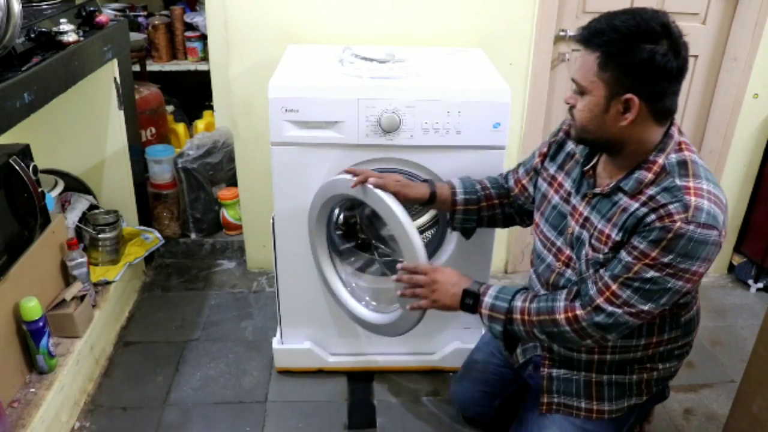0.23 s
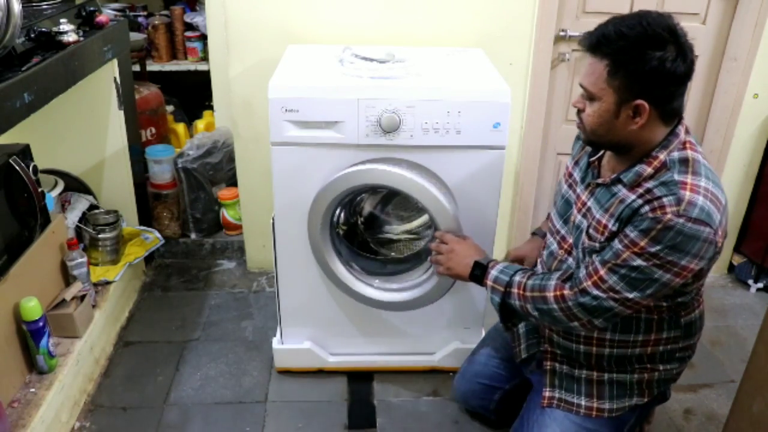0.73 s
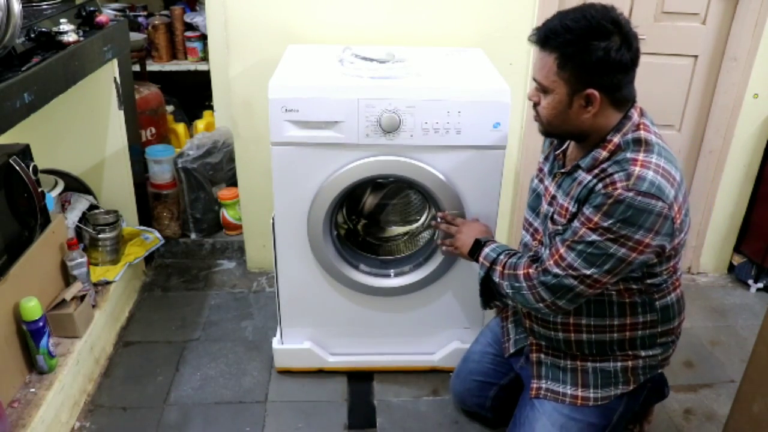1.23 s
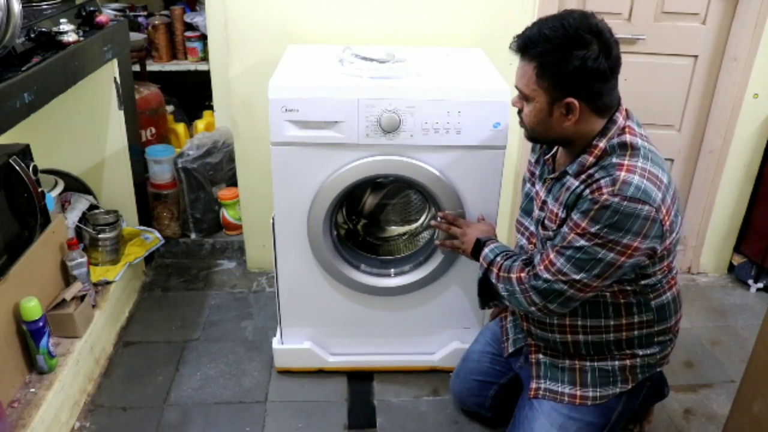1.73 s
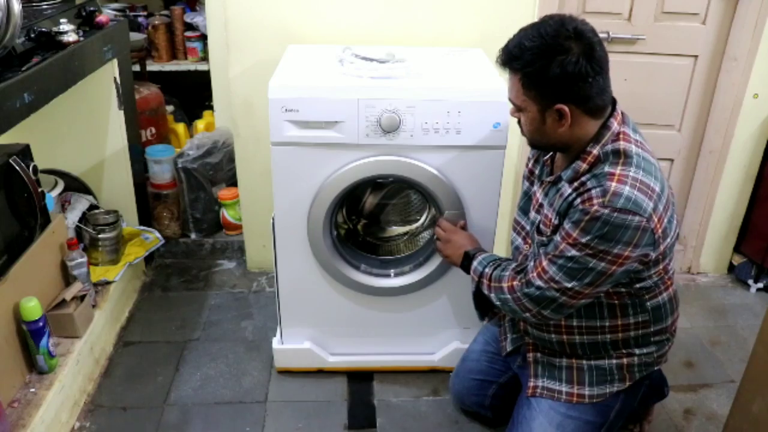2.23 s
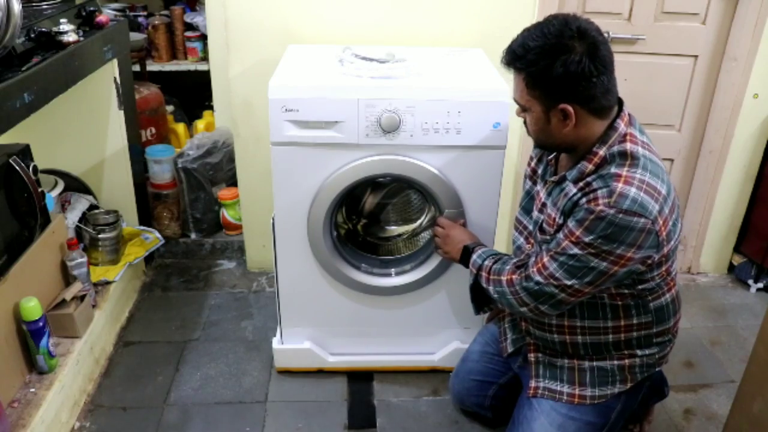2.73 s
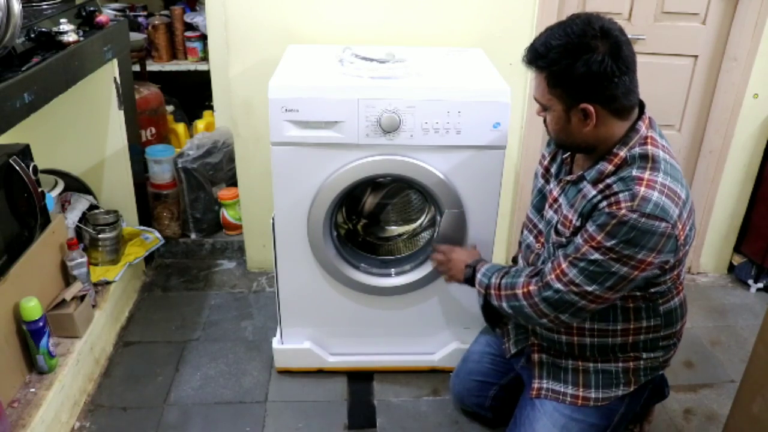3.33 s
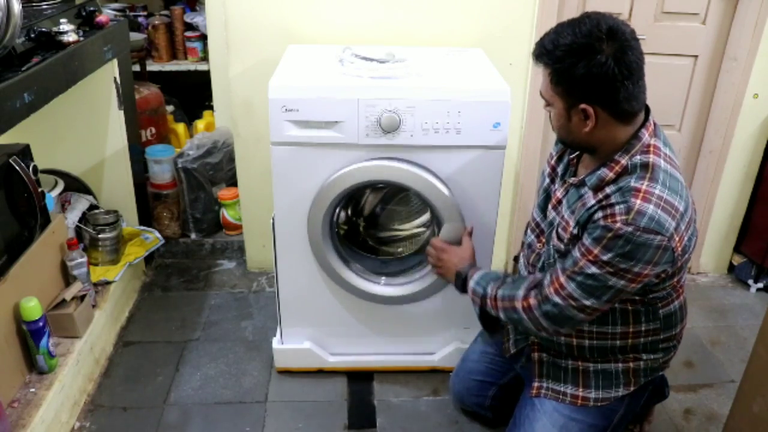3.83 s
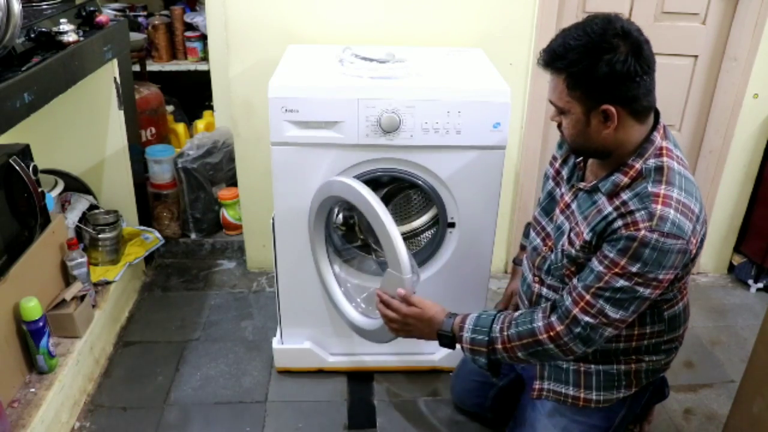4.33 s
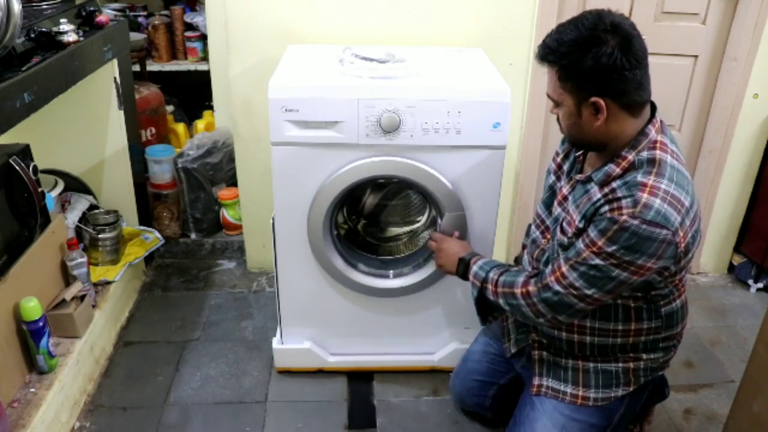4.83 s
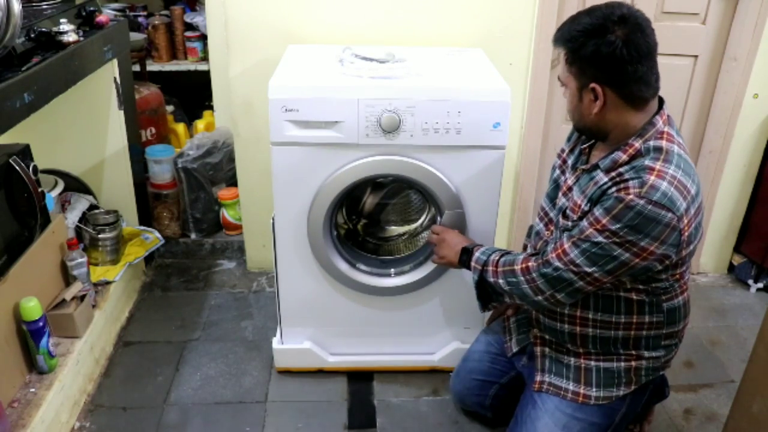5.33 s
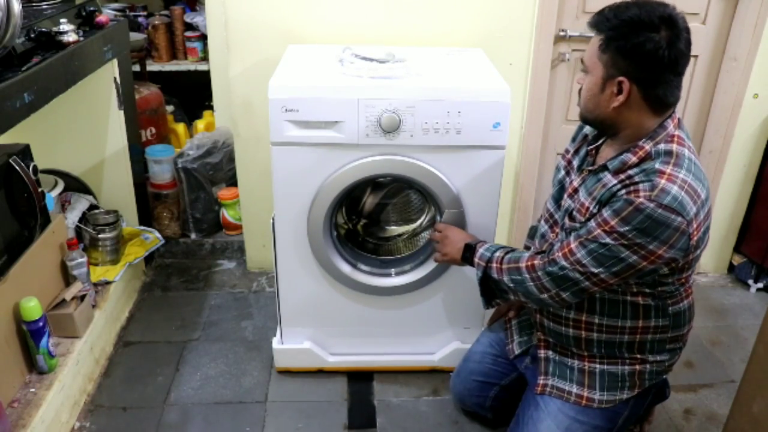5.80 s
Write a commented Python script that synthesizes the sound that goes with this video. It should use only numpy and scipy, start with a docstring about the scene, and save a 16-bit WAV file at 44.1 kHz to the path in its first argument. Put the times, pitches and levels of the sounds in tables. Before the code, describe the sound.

A quiet small tiled room with still air, low rumble and thin hiss. Sleeves swish softly at 0 and 0.4 seconds, and a hand brushes the door at 0.9. At 1.15 the hook knocks the catch with a quick bounce and a low cabinet boom. Light rubbing follows, with a plastic handle click at 2.1. Around 2.5 the seal groans and squeezes, then the latch snaps in a rapid cluster and the rim lands loudly, ringing briefly. Faint click at 2.9, cloth at 3.1, handle click at 3.7. At 3.85 the door jerks free in a dull, rubbery triple pop. From 4.05 to 4.9 five soft tub knocks grow duller and fade amid rubbing. The hook knocks again at 4.99, the seal squeaks at 5.2, and the second hard snap and slam comes at 5.53, with short echoes. The rumble swells slightly; a tiny click at 5.9.

```python
"""In a small tiled room the porthole door of a front-load washing machine is handled.
Twice its hook knocks against the catch and the door is then pushed home with a snap; in between it pops off
its seal and the tub rocks on its springs. Each blow is shaped noise with echoes and decaying modes.
Sleeves, hand and seal rub as swelling noise over still air, a low rumble and a thin hiss."""
import sys
import numpy as np
from scipy import signal
from scipy.fft import rfft, irfft
from scipy.io import wavfile
from scipy.ndimage import uniform_filter1d

SR = 44100
rng = np.random.default_rng(int(sys.argv[2]) if len(sys.argv) > 2 else 0)


def persist_wave(psi):
    """Save psi, clipped to +-1, as 16-bit WAV."""
    counts = np.round(np.clip(psi, -1, 1) * 32767).astype(np.int16)
    wavfile.write(sys.argv[1], SR, np.atleast_2d(counts).T)


N = 267334
TIME = np.arange(N) / SR  # s
RING_TIME = TIME[:32768]  # s, the span of one blow with its echoes
RING_HZ = np.arange(len(RING_TIME) // 2 + 1) * SR / len(RING_TIME)

# A blow is (start in s, energy of its crack in dB, tilt in dB per octave: its brightness).
# The door is pushed home. Each row: landing of the rim in seconds, then latch, rim and seal levels in dB.
CLOSINGS = [(2.5325, 2.5, 4.5, -12.5), (5.529, 3, 6, -18.5)]
# The hook meets the catch without locking. Each row: start in seconds, hook level in dB,
# hook tilt in dB per octave, cabinet level in dB.
KNOCKS = [(1.1485, -8.5, -0.1, -14.5), (4.9888, -8.5, 0.25, -28)]
# The door is pulled off its seal in jerks. Each row: start in seconds, lever level in dB, seal level in dB.
JERKS = [(3.837, -10, -5.5), (3.8544, -12, -1), (3.877, -15.5, -3.5)]
# Long rings of the door. Each row: frequency in Hz, relative level in dB, T60 in seconds.
DOOR_MODES = [(71, -6, 0.38), (109.7, -23, 0.69), (148, -15.5, 0.94), (200.4, -9.5, 0.56), (396, 1, 0.17),
              (441, 2, 0.26), (665, -6.5, 0.27), (845.4, 8.5, 0.16), (941, 2, 0.24), (1122, -2, 0.16),
              (1190, 0, 0.27), (1273, 2.5, 0.17), (1700, 1, 0.19), (1967, -0.5, 0.22), (2130, 0, 0.2),
              (2320, -11, 0.32), (3390, -8, 0.22), (3570, -2.5, .22)]
# Spectrum of the rubber seal. Each row: frequency in Hz, relative level in dB.
SEAL_COLOUR = [(25, -16), (70, -1), (150, 0), (290, 2), (420, -9.5), (1000, -12.5), (2000, -32),
               (10000, -61)]


def undb(db):
    """Amplitude gain is ten to the power of the level over 20 dB."""
    return 10 ** (np.asarray(db) / 20)


def at(points, hz):
    """Interpolate (Hz, value) points linearly on a log-frequency axis."""
    f, value = np.transpose(points)
    return np.interp(np.log(hz + 1), np.log(f), value)


def unit(x):
    """Normalise by the root of the energy, the sum of squares, to an energy of one."""
    return x / np.sqrt(np.sum(x ** 2))


def fade(t60):
    """Exponential damping: the amplitude falls by 60 dB in t60 seconds."""
    return np.exp(-np.log(1000) * RING_TIME / t60)


def add(track, s, sound):
    """Superposition: mix a sound into a track from time s in seconds."""
    start = int(s * SR)
    track[start:start + len(sound)] += sound[:N - start]


def noise(colour):
    """Filtered white noise: shape its spectrum by a (Hz, dB) curve and scale to a deviation of one."""
    spectrum = rfft(rng.standard_normal(N))
    gain = undb(at(colour, np.arange(N // 2 + 1) * SR / N))
    x = irfft(spectrum * gain, N)
    return x / x.std()


def causal(db):
    """Minimum phase by folding the cepstrum: nothing sounds before the blow."""
    cepstrum = irfft(np.log(undb(db)))
    cepstrum[1:] *= 2
    cepstrum[len(cepstrum) // 2:] = 0
    return np.exp(rfft(cepstrum))


def even(x, size):
    """Spectral whitening: level the broad humps over size bins and leave the fine structure."""
    spectrum = rfft(x)
    power = uniform_filter1d(np.abs(spectrum) ** 2, size)
    return spectrum * causal(-10 * np.log10(power + 1e-12))


def echoes(count, build_s):
    """Reverberation as noise bands decaying exponentially, with one independent tail per blow."""
    # Each row: band centre in Hz, T60 in seconds; the treble mostly dies first.
    room_t60 = [(60, 0.78), (200, 0.59), (500, 0.46), (1200, 0.4), (3500, 0.42), (6000, 0.38), (9000, 0.3),
                (15000, 0.2)]
    scatter = rfft(rng.standard_normal((count, len(RING_TIME))))
    centres = np.transpose(room_t60)[0]
    tails = np.zeros((count, len(RING_TIME)))
    for share, (hz, t60) in zip(np.eye(len(centres)), room_t60):
        band_gain = at(np.transpose([centres, share]), RING_HZ)  # overlapping bands that sum to one
        tails += irfft(scatter * band_gain) * fade(t60)
    # echoes off tiles and walls thicken after a short gap
    return tails * np.clip(RING_TIME / build_s - 0.3, 0, 1)


def strike(blows, colour, modes, chatter_s, chatter_db, room_db, modes_db, low_hz):
    """Impact excitation: a crack with chatter and echoes, plus a sum of damped modes."""
    track = np.zeros(N)
    # a part radiates little at wavelengths larger than itself
    low_loss_db = 10 * np.log10(1 + (low_hz / np.maximum(RING_HZ, 10)) ** 4)
    body_db = at(colour, RING_HZ) - low_loss_db
    octaves = np.log2(np.maximum(RING_HZ, 200) / 1000)  # the tilt pivots at 1 kHz
    # loose parts buzz against each other until they seat
    seating = np.exp(-(RING_TIME / chatter_s) ** 2)
    rings = np.array([undb(db) * fade(t60) * np.exp(2j * np.pi * hz * RING_TIME) for hz, db, t60 in modes])
    rings *= 1 - fade(0.0077)  # the rings build up gradually
    for (s, db, tilt), tail in zip(blows, echoes(count=len(blows), build_s=0.0083)):
        contact = undb(chatter_db) * unit(rng.standard_normal(len(RING_TIME)) * seating)
        contact[0] += 1  # the first impulse
        contact = unit(contact) + undb(room_db) * unit(tail)
        crack = irfft(even(contact, size=180) * causal(body_db + tilt * octaves))
        # the point of contact changes, so each blow catches the modes at another phase
        phases = np.exp(2j * np.pi * rng.random(len(modes)))
        tones = (phases @ rings).imag
        add(track, s, undb(db) * (unit(crack) + undb(modes_db) * unit(tones)))
    return track


def latch():
    """Snap action: the hook rides up the sprung catch, slips over it and snaps in, three impacts per closing."""
    # Each row: lead before the rim lands in seconds, level added in dB, tilt in dB per octave.
    latch_action = [(0.0143, -7.5, -4.5), (0.0068, -1.5, 0.83), (0.0038, 1, 0.5)]
    # Each row: frequency in Hz, relative level in dB.
    latch_colour = [(60, 4), (280, -12.5), (450, 4), (900, 2), (1500, -1), (2700, -0.5), (4000, -5),
                    (5200, -12), (7500, -15.5), (8700, -7), (9600, -22.5), (15000, -27.5)]
    blows = [(s - lead, latch_db + db, tilt)
             for s, latch_db, _, _ in CLOSINGS for lead, db, tilt in latch_action]
    return strike(blows, latch_colour, DOOR_MODES,
                  chatter_s=0.0088, chatter_db=22, room_db=-2, modes_db=-9.5, low_hz=67)


def rim():
    """Impact of the door: its rim lands at each closing and excites the door modes."""
    # Each row: frequency in Hz, relative level in dB.
    door_colour = [(70, -17.5), (200, -1), (290, -15.5), (420, -2), (620, -11), (850, 5.5), (1080, -6),
                   (1900, -2), (3300, -14), (6000, -24), (15000, -38)]
    blows = [(s, rim_db, -0.34) for s, _, rim_db, _ in CLOSINGS]
    return strike(blows, door_colour, DOOR_MODES,
                  chatter_s=0.0051, chatter_db=1, room_db=-5.5, modes_db=-1, low_hz=64.5)


def hook():
    """Rebound: the hook hits the catch and bounces once, as a second, weaker impact."""
    bounce_s, bounce_db = 0.0066, -2.2  # delay, level change
    # Each row: frequency in Hz, relative level in dB.
    hook_colour = [(60, -13.5), (300, -13), (480, -1), (700, -10.5), (920, -1), (1280, 1.5), (1900, -2.5),
                   (2600, -13.5), (3400, -20.5), (4200, -22), (7000, -35.5), (15000, -47)]
    # Each row: frequency in Hz, relative level in dB, T60 in seconds.
    hook_modes = [(146, -7, 0.5), (320, -11.5, 1), (421, -10, 0.21), (880, 1, 0.39), (1147, 5.5, 0.24),
                  (1275, 6, 0.16), (1540, 2, 0.16), (1640, -29, 0.2), (1976, 8, 0.11), (1880, -20, 0.16)]
    blows = []
    for s, db, tilt, _ in KNOCKS:
        blows += [(s, db, tilt), (s + bounce_s, db + bounce_db, tilt)]
    return strike(blows, hook_colour, hook_modes,
                  chatter_s=0.0054, chatter_db=12.5, room_db=-6.5, modes_db=-6.5, low_hz=90)


def seal():
    """Soft impacts drive cabinet modes: the seal is squeezed, the cabinet booms, the seal pops free."""
    squeeze_lead_s, cabinet_lag_s = 0.0265, 0.016  # before the rim lands, after the hook knocks
    # Each row: frequency in Hz, relative level in dB, T60 in seconds.
    cabinet_modes = [(71, -19, 0.59), (102, -4, 0.22), (152.2, 11, 0.44), (204, 8, .26), (289, -3.5, 0.27),
                     (499, 0.5, 0.24)]
    squeezes = [(s - squeeze_lead_s, db, -0.3) for s, _, _, db in CLOSINGS]
    booms = [(s + cabinet_lag_s, db, -0.29) for s, _, _, db in KNOCKS]
    pops = [(s, db, 0.092) for s, _, db in JERKS]
    return strike(squeezes + booms + pops, SEAL_COLOUR, cabinet_modes,
                  chatter_s=0.025, chatter_db=3.5, room_db=-3.5, modes_db=-3.0, low_hz=32)


def handle():
    """Light impacts on plastic: the handle clicks under the fingers and its lever at each jerk of the pull."""
    # Each row: start in seconds, level in dB, tilt in dB per octave.
    clicks = [(1.881, -30.5, -4), (2.0945, -15, -0.4), (2.922, -29, -5.5), (3.7065, -17, -1),
              (5.875, -23.5, 2)]
    # Each row: frequency in Hz, relative level in dB.
    handle_colour = [(60, 2.5), (550, -4), (900, -4), (1280, 2), (1500, -9), (1750, -3.5), (2300, -8),
                     (3000, -10.5), (3600, -12), (5400, -16.5), (6500, -19.5), (15000, -34)]
    # Each row: frequency in Hz, relative level in dB, T60 in seconds.
    handle_modes = [(869, 0.5, 0.39), (1275, 9.5, 0.12), (1635, 5, 0.14), (3000, -1, .12),
                    (4420, -11, 0.19)]
    slips = [(s, db, -1.3) for s, db, _ in JERKS]
    return strike(clicks + slips, handle_colour, handle_modes,
                  chatter_s=0.0082, chatter_db=19, room_db=-1, modes_db=-8, low_hz=89.5)


def tub(count):
    """Oscillation on springs: each swing knocks softly, shorter and duller than the last."""
    start_s, period_s, quicken_s = 4.052, 0.2097, 0.0034  # first knock, first period, loss per swing
    top_db, strongest, fade_db = -19.5, 1.18, 2  # peak, swing where it lies, loss per swing to either side
    # Each row: frequency in Hz, relative level in dB.
    tub_colour = [(60, -38), (250, -10.5), (380, -4.5), (640, -7), (800, -11), (1700, -13.5), (3000, -24.5),
                  (12000, -49)]
    # Each row: frequency in Hz, relative level in dB, T60 in seconds.
    tub_modes = [(381, 16, 0.025), (502, 4, 0.054), (580, -4.5, 0.56), (660, -3, 0.31), (907, -7.5, 0.43),
                 (1306, -14, 0.31)]
    swing = np.arange(count)
    times = start_s + swing * (period_s - quicken_s * (swing - 1) / 2)
    levels = top_db - fade_db * np.abs(swing - strongest)
    tilts = 0.15 - 0.15 * swing  # dB per octave
    return strike(list(zip(times, levels, tilts)), tub_colour, tub_modes,
                  chatter_s=0.007, chatter_db=5, room_db=8.5, modes_db=0, low_hz=206)


def rub(strokes, colour, grain_db, size):
    """Friction noise under a Gaussian swell per stroke, roughened by random grain averaged over size samples."""
    swell = sum(undb(db) * np.exp(-0.5 * ((TIME - s) / half) ** 2) for s, half, db in strokes)
    grain = uniform_filter1d(rng.standard_normal(N), size) * np.sqrt(size)
    return swell * undb(grain_db * grain) * noise(colour)


def sleeves():
    """Friction of cloth: catching fibres make the swishes grainy."""
    # Each row: centre in seconds, Gaussian half length in seconds, level in dB before the grain.
    swishes = [(.04, 0.14, -62), (.41, 0.057, -60), (2.13, 0.14, -67.5), (3.07, 0.031, -62),
               (3.9, 0.083, -60.5), (4.2, 0.12, -61)]
    # Each row: frequency in Hz, relative level in dB.
    cloth_colour = [(200, -25), (800, -4.5), (1800, 0.5), (4000, -4), (8500, -1.5), (14000, -13)]
    return rub(swishes, cloth_colour, grain_db=0.7, size=200)


def hand():
    """Friction of hand and hinge on the door, as broad noise that weakens in the treble."""
    # Each row: centre in seconds, Gaussian half length in seconds, level in dB before the grain.
    rubs = [(.89, 0.032, -62.5), (1.62, 0.19, -65.5), (2.02, 0.045, -62.5), (2.44, 0.06, -68.5),
            (3.615, 0.016, -60), (4.12, 0.39, -62.5), (5.5, 0.014, -58.5)]
    # Each row: frequency in Hz, relative level in dB.
    rub_colour = [(100, -1), (550, 2.5), (850, 2.5), (1250, 0.5), (2200, -4.5), (8000, -22)]
    return rub(rubs, rub_colour, grain_db=0.1, size=400)


def squeaks():
    """Friction of glass on rubber: narrow-band noise makes the faint squeaks."""
    # Each row: centre in seconds, Gaussian half length in seconds, level in dB before the grain.
    squeak_strokes = [(1.548, 0.008, -63), (2.42, 0.04, -66.5), (5.175, 0.032, -57.5)]
    # Each row: frequency in Hz, relative level in dB.
    squeak_colour = [(500, -13), (950, -9), (1200, 3), (1500, -14), (3000, -38)]
    return rub(squeak_strokes, squeak_colour, grain_db=3.0, size=400)


def groan():
    """Friction in the rubber seal as the door is leaned on: noise with the seal's own spectrum."""
    # Each row: centre in seconds, Gaussian half length in seconds, level in dB before the grain.
    groans = [(2.46, 0.043, -57)]
    return rub(groans, SEAL_COLOUR, grain_db=1.5, size=400)


def high_hiss():
    """Band-limited noise under a slow Gaussian envelope: a thin high hiss comes and goes."""
    # Each row: centre in seconds, Gaussian half length in seconds, level in dB before the grain.
    hisses = [(1.5, 0.48, -71.5)]
    # Each row: frequency in Hz, relative level in dB.
    hiss_colour = [(6800, -32), (8300, 1), (9700, -1), (10800, -9)]
    return rub(hisses, hiss_colour, grain_db=-0.5, size=400)


def room_air():
    """Stationary noise with a fixed spectrum: the still air of the room."""
    # Each row: frequency in Hz, relative spectral density in dB.
    air = [(20, -34), (45, -11.5), (69, -0.5), (88, -24), (150, -10.5), (330, -15), (800, -19.5),
           (1800, -23), (4000, -25), (9000, -26), (15000, -27.5)]
    return undb(-63.5) * noise(air)


def rumble():
    """Low-frequency noise from outside, steady but for one slow Gaussian swell."""
    steady_db, swell_s, swell_half_s, swell_db = -76, 5.33, 0.98, -61
    # Each row: frequency in Hz, relative level in dB.
    rumble_colour = [(40, -16), (85, -11.5), (104, 2.5), (122, -11), (148, 2.5), (175, -2), (260, -13.5),
                     (600, -18.5), (3000, -45)]
    swell = undb(swell_db) * np.exp(-0.5 * ((TIME - swell_s) / swell_half_s) ** 2)
    return (undb(steady_db) + swell) * noise(rumble_colour)


def side_hiss(side_db):
    """Opposite polarity in the two channels: a thin hiss that spreads to the sides."""
    hiss = undb(side_db) * noise([(40, 5.5), (200, 3.5), (1000, 1), (6000, 3), (14000, 1.5)])  # (Hz, dB)
    return np.array([hiss, -hiss])


def scene():
    """Superposition: the machine stands straight ahead, alike in both channels; only the side hiss differs."""
    blows = latch() + rim() + hook() + seal() + handle() + tub(count=5)
    friction = sleeves() + hand() + squeaks() + groan()
    background = high_hiss() + room_air() + rumble() + side_hiss(side_db=-66.5)
    return blows + friction + background


def record(dry):
    """Band limiting: the recorder cuts the top with a steep elliptic low-pass."""
    top_hz = 15550
    low_pass = signal.ellip(12, 0.1, 80, top_hz, fs=SR, output="sos")  # order, ripple dB, stopband dB
    return signal.sosfilt(low_pass, dry)


dry = scene()
out = record(dry)
persist_wave(out)
```